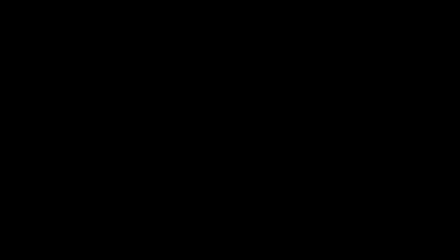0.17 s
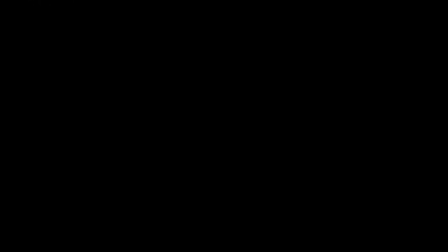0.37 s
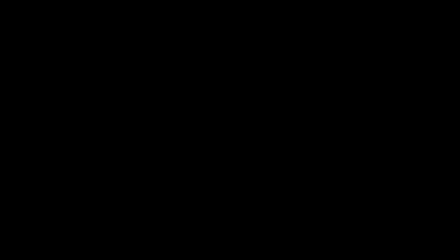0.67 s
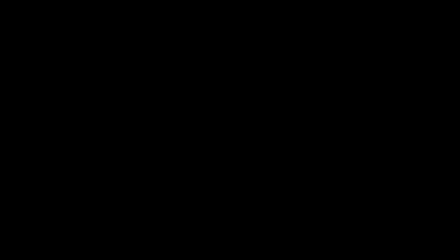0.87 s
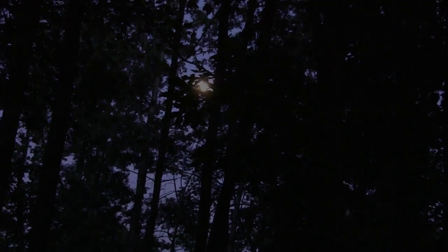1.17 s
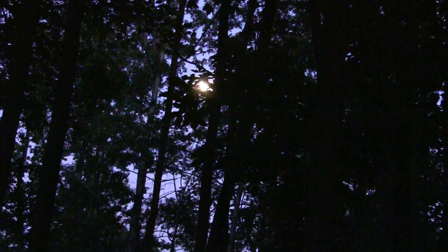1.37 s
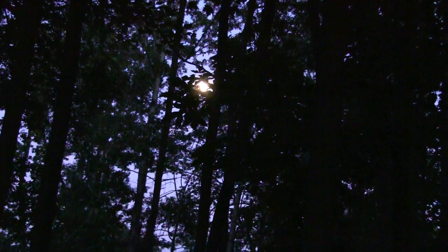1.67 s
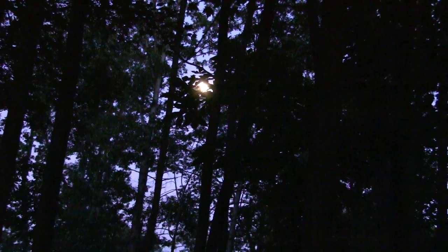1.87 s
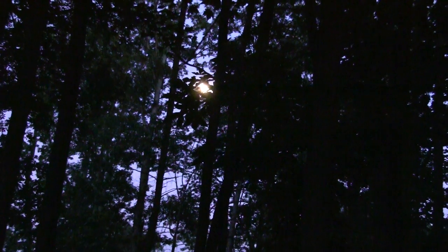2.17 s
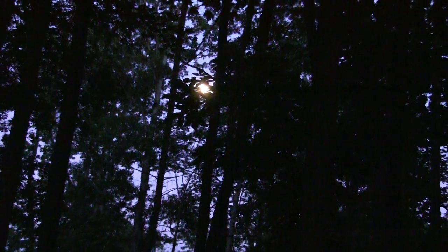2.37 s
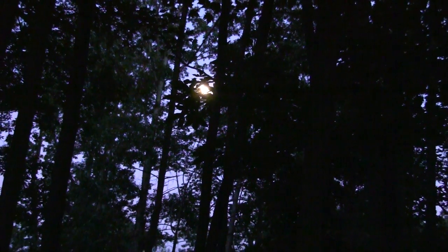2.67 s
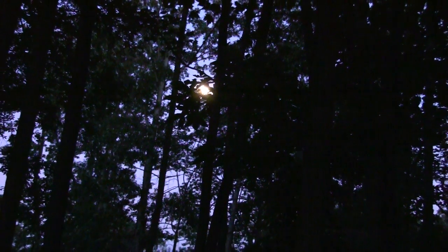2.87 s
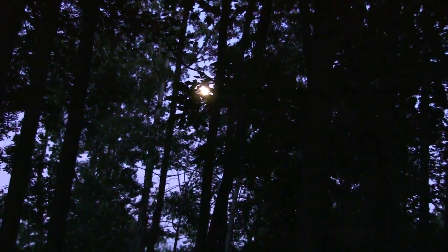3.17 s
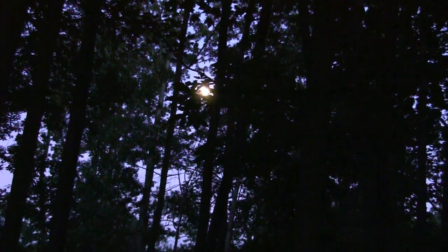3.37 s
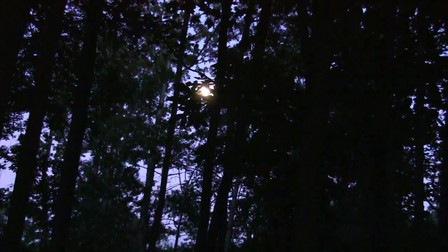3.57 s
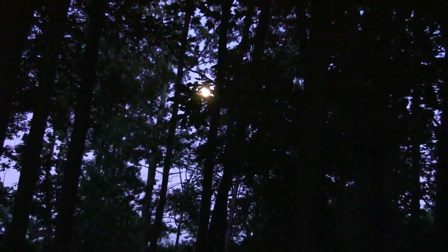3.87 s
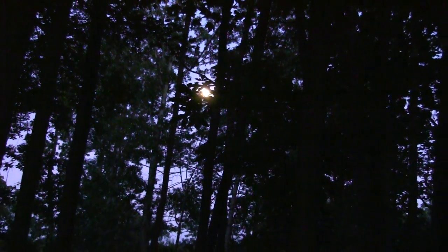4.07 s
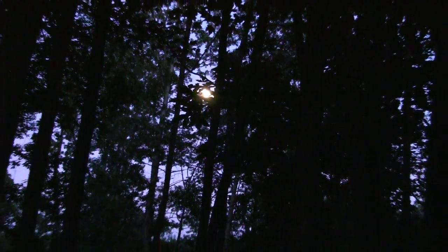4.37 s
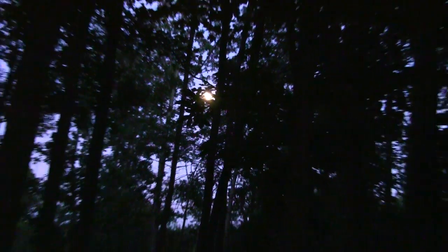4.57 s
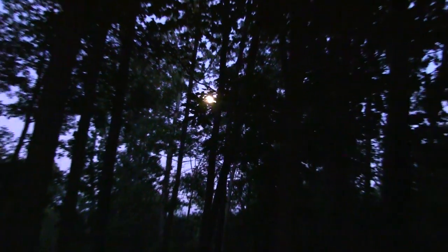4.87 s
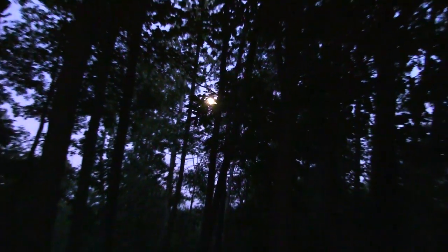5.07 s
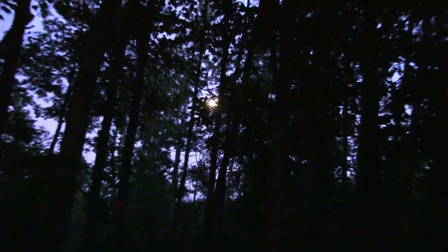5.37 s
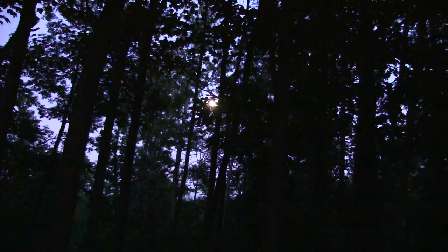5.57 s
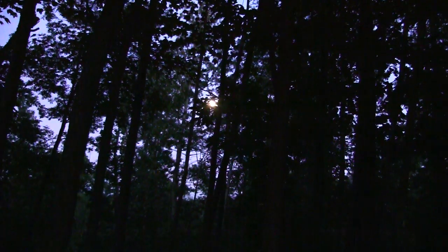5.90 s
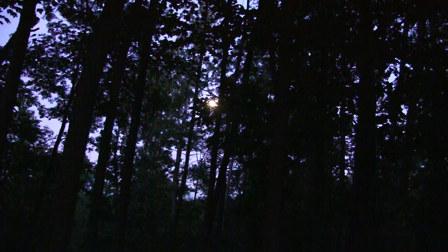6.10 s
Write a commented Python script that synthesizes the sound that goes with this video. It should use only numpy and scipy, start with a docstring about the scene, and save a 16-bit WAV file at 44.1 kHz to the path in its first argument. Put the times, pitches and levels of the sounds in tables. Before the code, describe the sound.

A dense chorus of crickets trills steadily in a dusk forest, fading in from silence, with katydid rasps, short close buzzes and faint handling knocks.

```python
"""A forest at dusk, heard in stereo from a hand-held camera: all of it, air and rumble included, fades in from silence.
Six kinds of cricket trill without pause, near singers over a far chorus of shaped noise; others sing and stop.
A close insect buzzes in short runs of noise strokes, while a distant one swells and ebbs.
From the first second katydids rasp in smooth bursts of noise, and the grip shifts on the camera shell:
soft rumble, dull decaying knocks, and later one low creak, a tone that glides down."""
import sys
import numpy as np
from scipy import signal
from scipy.fft import rfft, irfft, next_fast_len
from scipy.io import wavfile
from scipy.ndimage import map_coordinates

SR = 44100
rng = np.random.default_rng(int(sys.argv[2]) if len(sys.argv) > 2 else 0)


def wrap_up_sound(samples):
    """Save the sound to the file named by the first command line argument, as 16-bit audio."""
    columns = np.atleast_2d(samples).T
    # keep every value between -1 and 1, then stretch to whole-number steps
    tamed = np.clip(columns, -1, 1)
    steps = np.round(tamed * 32767).astype(np.int16)
    wavfile.write(sys.argv[1], SR, steps)


N = 275184
T = np.arange(N) / SR

# Background hiss: (frequency [Hz], relative level per Hz [dB])
HISS_SPECTRUM = [(20, -10), (45, -17.5), (90, -5.5), (200, -7), (500, -9.5), (1000, -14.5), (1500, -18),
                 (3700, -16.5), (6500, -13), (7900, -27), (9400, -16.5), (12200, -20.5), (13500, -18),
                 (15700, -21)]
# Deep rumble early on: (time [s], level before the lean [dB])
DEEP_RUMBLE = [(.5, -66), (1.5, -69), (1.95, -72), (2.1, -84), (6.24, -86)]
# Far drone of the woods: (time [s], level before the lean [dB])
FAR_MURMUR = [(1.3, -62.5), (2.14, -61.5), (3.32, -67), (4.9, -69.5), (5.62, -65.5), (6.24, -68)]
# Left-right lean of the air: (frequency [Hz], left minus right [dB])
AIR_LEAN = [(60, 1), (150, -3.5), (380, 0), (700, -2.5), (1300, -3), (2500, -0.5)]
# Faint steady tone: (middle frequency [Hz], middle level [dB])
FAINT_TONE = (355, -69.5)
# Left-right correlation of the diffuse noise, wider in the lows, nearly mono in the treble:
# (frequency [Hz], correlation [-1 to 1])
STEREO_CORRELATION = [(60, 0.65), (99, 0.84), (160, 0.51), (270, 0.71), (450, 0.57), (740, 0.28),
                      (1220, 0.51), (2010, 0.64), (3330, 0.91), (5500, 0.99), (9080, 1), (10500, 1),
                      (15000, 1.0)]
# Trilling crickets: (nearest pitch [Hz], others' middle pitch [Hz], pitch spread [Hz], pulse rate [1/s],
# first pulse [s], nearest level [dB], others' level [dB], far chorus level [dB],
# chorus resonance width [Hz], left minus right [dB])
CRICKET_KINDS = [(2302, 2310, 55, 48.8, 0.0084, -51, -47.5, -41.5, 363, -0.5),
                 (2690, 2630, 70, 42.5, 0.012, -50.5, -48, -45, 356, 3.5),
                 (3107, 3110, 60, 34.95, 0.019, -57, -55, -51, 357, -3),
                 (4910, 4550, 190, 43, 0.0055, -69, -60.5, -58, 920, -0.5),
                 (5660, 5540, 140, 26.2, 0.012, -57, -51, -47, 695, 0.5),
                 (6490, 6000, 23, 25, .01, -76.5, -82, -78, 100, -6)]
# Crickets that pause: (start [s], end [s], pitch [Hz], pulse rate [1/s], level setting [dB])
PAUSING_TRILLS = [(1.62, 2.1, 4680, 50, -58), (1.942, 2.28, 4770, 48, -58), (4.298, 4.97, 4720, 47, -63),
                  (5.49, 5.9, 4860, 41, -69)]
# Close buzz strokes: (time [s], level setting [dB], treble level setting [dB])
BUZZ_STROKES = [(.595, -55, -58), (.695, -54, -56), (1.5404, -54.5, -69), (1.6232, -57, -74),
                (1.7035, -56, -66), (1.7988, -53.5, -67), (2.3231, -49, -55), (2.4094, -51, -56),
                (2.4996, -51, -56.5), (2.5994, -50.5, -56)]
# Close buzz resonances: (frequency [Hz], resonance width [Hz], relative level [dB])
BUZZ_MODES = [(7300, 720, -4.5), (7950, 400, -1.5), (8100, 2900, -4.5)]
# Close buzz treble resonances: (frequency [Hz], resonance width [Hz], relative level [dB])
BUZZ_TREBLE_MODES = [(10050, 1700, 0), (11400, 2600, -1.5)]
# Distant buzz swells: (start [s], peak [s], end [s], swell level at the peak, added to the rest level [dB])
DISTANT_SWELLS = [(0.198, .8, 1.09, -62), (.9, 1.55, 2.02, -59), (2.1, 2.6, 2.8, -59),
                  (2.9, 3.65, 4.1, -59.5), (4.4, 4.7, 4.9, -74), (4.85, 5.85, 6.1, -63)]
# Katydid rasps, about five a second in phrases: (middle [s], width at half height [s], level [dB])
KATYDID_RASPS = [(.9, 0.13, -49.5), (1.228, 0.12, -46), (1.42, .14, -48.5), (1.678, 0.13, -57),
                 (1.87, 0.13, -51), (2.08, 0.12, -53.5), (2.22, 0.11, -57), (2.61, 0.1, -53.5),
                 (2.808, 0.12, -54), (3.1, 0.13, -51.5), (3.275, 0.13, -50.5), (3.382, 0.076, -52),
                 (3.598, 0.15, -53.5), (3.82, .1, -57), (4.31, .16, -50.5), (4.5, .13, -49.5),
                 (4.722, 0.12, -48.5), (4.923, .15, -50), (5.132, 0.11, -52.5), (5.552, 0.13, -52.5),
                 (5.768, 0.098, -50.5), (5.99, .13, -53), (6.198, 0.16, -56)]
# Katydid wing resonances: (frequency [Hz], resonance width [Hz], relative level [dB])
KATYDID_MODES = [(2000, 1120, -2.5), (4100, 2700, -4), (4710, 2100, 1.5)]
# Shifts of the grip: (start [s], length before release [s], level setting [dB])
GRIP_SHIFTS = [(.8, 0.09, -56), (1.23, 0.29, -60), (1.653, .35, -65), (3.047, 0.11, -65), (4.4, .45, -59),
               (4.967, 0.56, -59.5)]
# Camera shell resonances: (frequency [Hz], resonance width [Hz], relative level [dB])
SHELL_MODES = [(125, 98, 0), (218, 60, -10.5)]
# Knocks on the shell: (time [s], level setting before attack and decay [dB], pitch [Hz])
SHELL_KNOCKS = [(1.037, -38, 139), (1.261, -40, 126), (4.423, -36.5, 94), (5.281, -47, 139)]
# A low creak: (time [s], pitch [Hz], level setting [dB])
CREAK = [(4.53, 145, -55), (4.66, 142, -48), (4.74, 124.2, -55), (4.9, 121, -57)]
# Fade-in: (start [s], length [s], curve power)
FADE_IN = (.487, .9, 1.48)

BUZZ_RIPPLE_DB = 4  # depth of the fine spectral ripples
STROKE_RISE_S, STROKE_HOLD_S, STROKE_T60_S = .012, .035, .3
SWELL_REST_DB = -74.5
RASP_BED_DB = -73  # far katydids between the rasps
GRIP_REST_DB, GRIP_ATTACK_S, GRIP_RELEASE_S = -66, .03, .12
SCUFF_DB, SCUFF_T60_S = -16, .04  # brighter edge of a knock, relative to its level setting
KNOCK_RISE_S, KNOCK_T60_S = .0038, .13
TOP_HZ = 15760


def amp(db):
    """Gain of a level in dB."""
    return 10 ** (np.asarray(db) / 20)


def unit(x):
    """Scaled to rms 1."""
    return x / np.sqrt(np.mean(x ** 2) + 1e-20)


def along(points, hz):
    """Values of (Hz, value) points, joined on a log frequency axis."""
    f, v = np.transpose(points)
    return np.interp(np.log(hz + 1), np.log(f + 1), v)


def curves(rows):
    """One value per sample for each column after the time."""
    s, *columns = np.transpose(rows)
    return [np.interp(T, s, column) for column in columns]


def wobble(rate):
    """A smooth random curve, rate knots a second."""
    knots = rng.standard_normal(int(N * rate / SR) + 4)
    return map_coordinates(knots, [T * rate])


def filtered(x, response):
    """Sound shaped by a response over frequency."""
    m = next_fast_len(N + 8192)
    spectrum = rfft(x, m) * response(np.fft.rfftfreq(m, 1 / SR))
    return irfft(spectrum, m)[..., :N]


def wings(modes):
    """Resonances whose powers add; cubing makes each steeper and narrower than its width setting."""
    def response(f):
        power = 0
        for center, width, db in modes:
            damping = (f * width) ** 2
            resonance = damping / ((center * center - f * f) ** 2 + damping)
            power = power + amp(2 * db) * resonance ** 3
        return np.sqrt(power)
    return response


def rush(response, ripple_db=2.5, ripple_hz=25):
    """Diffuse stereo noise of rms 1, with fixed random fine ripples in its spectrum."""
    knots = rng.standard_normal(SR // 10)

    def mid_side(hz):
        turn = np.arccos(np.clip(along(STEREO_CORRELATION, hz), -1, 1)) / 2
        ripple = amp(ripple_db * np.interp(hz / ripple_hz, np.arange(len(knots)), knots))
        return response(hz) * ripple * [np.cos(turn), np.sin(turn)]

    mid, side = filtered(rng.standard_normal((2, N)), mid_side)
    return unit(np.array([mid + side, mid - side]))


def air():
    """Far murmur of the woods, hiss, a deep rumble that dies away and one faint wavering tone."""
    bed = amp(-52) * rush(lambda hz: amp(along(HISS_SPECTRUM, hz)), ripple_db=1.17)
    bed += amp(curves(DEEP_RUMBLE)[0]) * rush(wings([(66, 70, 0)]))
    bed += amp(curves(FAR_MURMUR)[0]) * rush(wings([(874, 810, 0)]))
    bed = filtered(bed, lambda hz: amp(along(AIR_LEAN, hz) / 2 * np.array([[1], [-1]])))
    hz, db = FAINT_TONE
    cycles = np.cumsum(hz + 6 * wobble(8)) / SR
    tone = amp(db + 2.1 * wobble(7.7)) * np.sin(2 * np.pi * cycles)
    return bed + tone


def singer(hz, rate, start, duty=0.606, glide_hz=90, scatter_db=2.0, slip=0.21):
    """Wing strokes: each a short tone that falls in pitch and slips in phase by a share of a cycle."""
    beat = np.maximum(T - start, 0) * rate
    stroke = beat.astype(int)
    part = np.minimum(beat % 1 / duty, 1)  # progress through the sounding share
    luck = rng.standard_normal((int(N / SR * rate) + 2, 2))[stroke]
    fall = glide_hz * duty / rate * (part - part ** 2)  # in cycles: pitch goes from +glide to -glide
    tone = np.sin(2 * np.pi * (hz * T + fall + slip * luck[:, 1]))
    return unit(amp(scatter_db * luck[:, 0]) * np.sin(np.pi * part) * tone)


def forest(x, t60=0.29):
    """Trunks scatter a sound into a short tail, different at each microphone."""
    t = T[:SR // 2]
    tail = amp(-60 * t / t60) * rng.standard_normal((2, len(t)))
    return signal.fftconvolve(x[None], tail / np.linalg.norm(tail[0]), axes=1)[:, :N]


def crickets(count=4):
    """For each kind one near singer, farther ones at their own pitch and pace, and an unresolved far chorus."""
    near, far = np.zeros((2, N)), np.zeros((2, N))
    for near_hz, hz, spread_hz, rate, start, near_db, others_db, far_db, width_hz, pan_db in CRICKET_KINDS:
        side = amp([[pan_db / 2], [-pan_db / 2]])
        others = np.zeros(N)
        for pitch in hz + spread_hz * np.linspace(-1.5, 1.5, count):
            loudness = amp(2.0 * wobble(1.5))
            others += loudness * singer(pitch, rate * rng.normal(1, .1), rng.random() / rate)
        nearest = amp(near_db + 1.4 * wobble(2.64)) * singer(near_hz, rate, start)
        near += side * (nearest + amp(others_db) * unit(others))
        far += side * amp(far_db + 0.27 * wobble(2.79)) * rush(wings([(hz, width_hz, 0)]))
    for start, end, hz, rate, db in PAUSING_TRILLS:
        gate = np.interp(T, [start, start + 0.12, end - .03, end], [0, 1, 1, 0])
        near += amp(db) * gate * singer(hz, rate, start, duty=0.53, glide_hz=130, slip=0.38)
    return near + amp(-7) * forest(near.mean(0)) + far


def close_buzz():
    """Each stroke drags teeth unevenly over a scraper: noise with a quick rise, a hold and a decay."""
    low, high = np.zeros(N), np.zeros(N)
    for s, db, treble_db in BUZZ_STROKES:
        rise = np.clip((T - s) / STROKE_RISE_S, 0, 1)
        fading_s = np.maximum(T - s - STROKE_RISE_S - STROKE_HOLD_S, 0)
        shape = rise * amp(-60 * fading_s / STROKE_T60_S)
        low += amp(db) * shape
        high += amp(treble_db) * shape
    teeth = unit(amp(0.77 * wobble(400)))
    body = low * rush(wings(BUZZ_MODES), ripple_db=BUZZ_RIPPLE_DB)
    treble = high * rush(wings(BUZZ_TREBLE_MODES), ripple_db=BUZZ_RIPPLE_DB)
    return teeth * (body + treble)


def distant_buzz():
    """A far cousin: one broad resonance of noise that swells and ebbs."""
    swell = np.full(N, amp(SWELL_REST_DB))
    for start, peak, end, db in DISTANT_SWELLS:
        ramp = np.interp(T, [start, peak, end], [0, 1, 0])
        swell += amp(db) * np.sin(np.pi / 2 * ramp) ** 2
    return swell * amp(0.52 * wobble(11.0)) * rush(wings([(7840, 3200, 0)]))


def katydids():
    """Broad rasps of resonant noise, each a smooth rise and fall, blurred by distance."""
    level = np.full(N, amp(RASP_BED_DB))
    for s, width_s, db in KATYDID_RASPS:
        level += amp(db) * np.cos(np.pi / 2 * np.clip((T - s) / width_s, -1, 1)) ** 2
    return level * rush(wings(KATYDID_MODES))


def handling():
    """The grip shifts on the shell: lumpy resonant rumble, dull decaying knocks, one gliding creak."""
    grip = np.full(N, amp(GRIP_REST_DB))
    for s, length, db in GRIP_SHIFTS:
        times = [0, GRIP_ATTACK_S, length, length + GRIP_RELEASE_S]
        grip += amp(db) * np.interp(T - s, times, [0, 1, 1, 0])
    out = grip * unit(amp(1.1 * wobble(8.8)) * rush(wings(SHELL_MODES)))
    scuff = rush(wings([(300, 500, 0)]))
    for s, db, hz in SHELL_KNOCKS:
        t = np.maximum(T - s, 0)
        out += amp(db + SCUFF_DB - 60 * t / SCUFF_T60_S) * (T > s) * scuff
        attack = 1 - np.exp(-t / KNOCK_RISE_S)
        out += amp(db - 60 * t / KNOCK_T60_S) * attack * np.sin(2 * np.pi * hz * t)
    hz, db = curves(CREAK)
    first, last = CREAK[0][0], CREAK[-1][0]
    gate = np.interp(T, [first - .03, first, last, last + 0.0296], [0, 1, 1, 0])
    out += gate * amp(db) * np.sin(2 * np.pi * np.cumsum(hz) / SR)
    return out * amp([[-1.5], [1.5]])  # the right microphone is 3 dB louder


def scene():
    """All sources at the two microphones."""
    return air() + crickets() + close_buzz() + distant_buzz() + katydids() + handling()


def record(dry):
    """A fade-in, then the band limit."""
    start, length, power = FADE_IN
    fade = np.clip((T - start) / length, 0, 1) ** power
    return filtered(dry * fade, lambda hz: hz < TOP_HZ)


dry = scene()
out = record(dry)
wrap_up_sound(out)
```